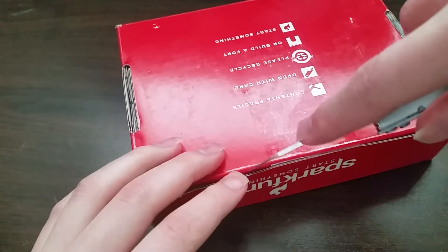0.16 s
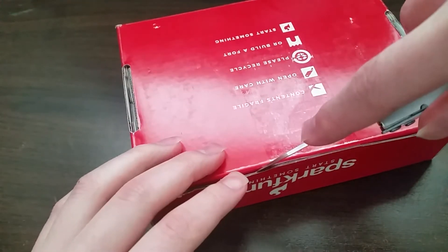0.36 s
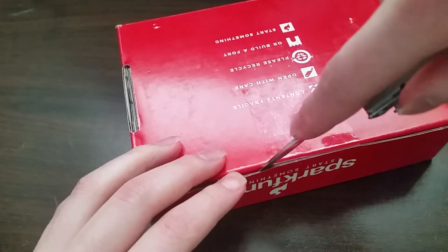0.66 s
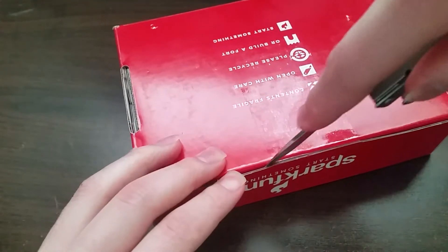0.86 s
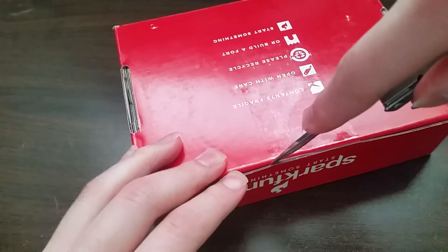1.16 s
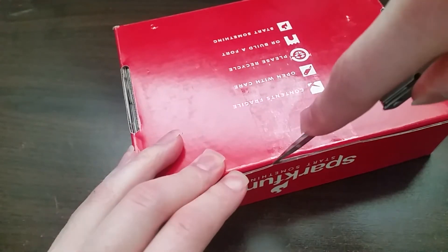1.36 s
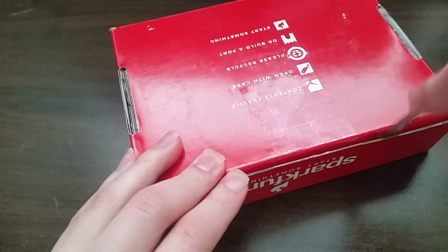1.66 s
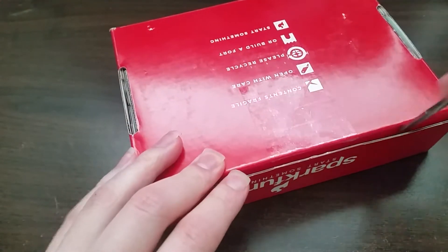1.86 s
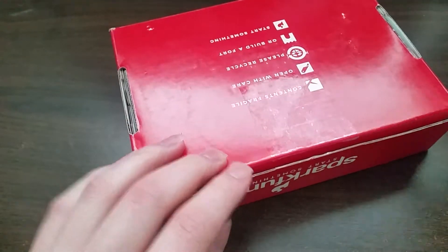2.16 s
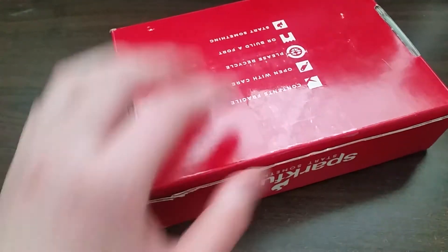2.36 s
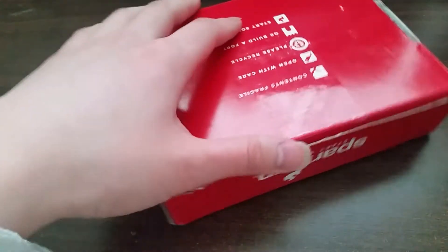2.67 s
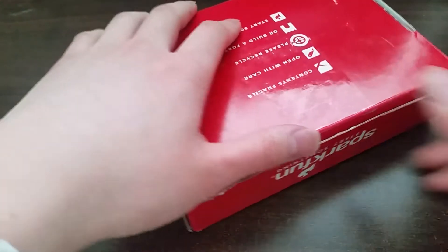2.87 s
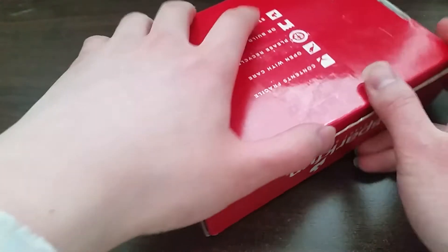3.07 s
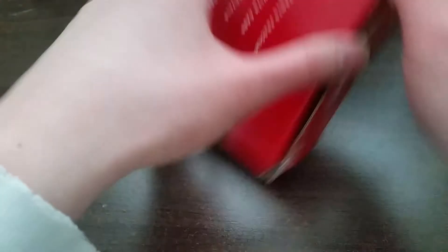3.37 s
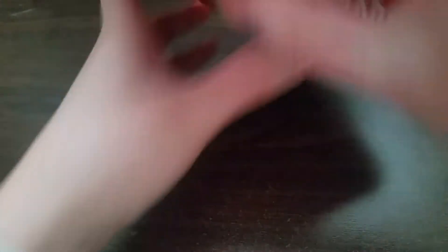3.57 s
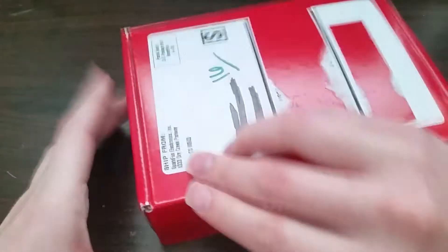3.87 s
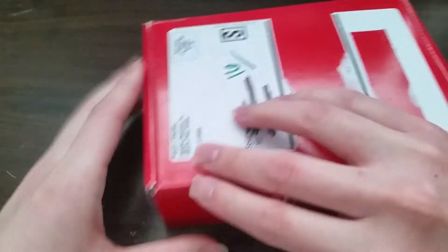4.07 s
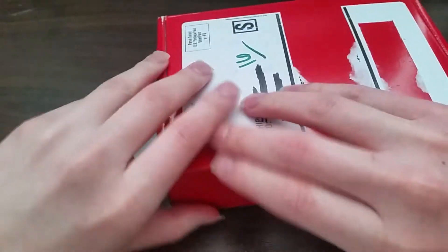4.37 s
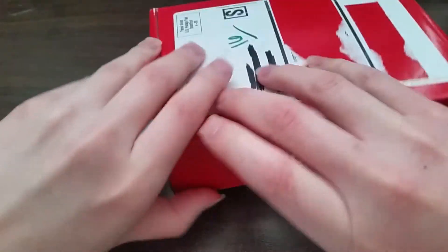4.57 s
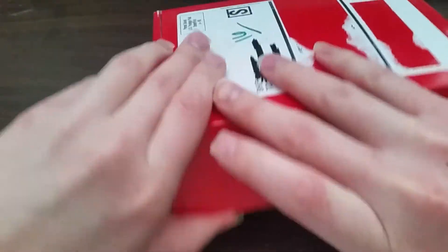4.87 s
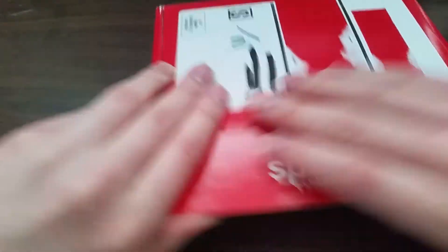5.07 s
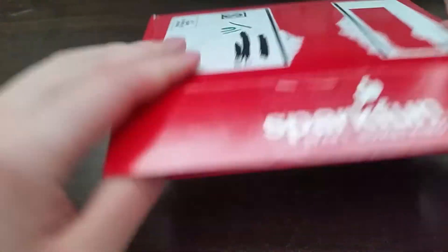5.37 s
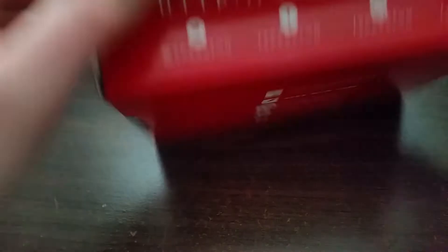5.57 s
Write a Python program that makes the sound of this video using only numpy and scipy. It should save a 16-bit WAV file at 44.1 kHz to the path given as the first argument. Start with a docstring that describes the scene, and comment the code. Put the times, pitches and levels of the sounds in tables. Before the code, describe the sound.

A small card box on a desk, heard very close. Faint dull taps come first, then a knife drops with a short double clatter, slightly to the right. A quiet gap leads to clustered hollow knocks, rustling handling and a heavy thud as the box is set down. Small finger taps follow, then scratchy cardboard scraping, a strong pop and a last thump, over unsteady low hum.

```python
"""A desk in a quiet room: close by, a blade and then fingers work at the taped flap of a small card box.
The knife drops on the desk; the box is turned, knocked down and slid, and the flap is pulled open.
Blows ring modes of card, steel and desk; strokes are random slips that drone, crackle, rasp, hiss and sing.
Far below lie a mains hum and a broad hiss; both swell and sink in level over time."""
import sys
import numpy as np
from scipy import signal
from scipy.fft import rfft, irfft
from scipy.io import wavfile

SR = 44100
rng = np.random.default_rng(int(sys.argv[2]) if len(sys.argv) > 2 else 0)


def master(y):
    """Save y as 16-bit WAV."""
    cut = np.clip(np.atleast_2d(y).T, -1, 1)
    pcm = np.round(cut * 32767)  # scale
    wavfile.write(sys.argv[1], SR, pcm.astype(np.int16))


N = 252712    # samples


# Blows on the box: (time [s], knock level [dB], thud level [dB], click level [dB])
BOX_BLOWS = [(0.095, -31.5, -24, -43.5), (0.238, -43.5, -34, -69), (0.264, -26, -32.5, -48),
             (0.342, -33.5, -45, -57), (0.555, -34.5, -29, -40.5), (0.705, -46, -40.5, -65),
             (0.949, -34.5, -38.5, -50), (1.116, -42, -35.5, -74), (1.283, -40.5, -35.5, -59.5),
             (1.76, -43, -43, -46.5), (1.92, -40.5, -53, -60), (1.933, -49, -50.5, -55),
             (2.178, -70, -77, -73), (2.255, -85, -85, -74), (2.508, -70, -54, -69),
             (2.538, -33, -25, -47.5), (2.648, -30.5, -31, -65), (2.7, -69, -26, -40),
             (2.732, -10.5, -17.5, -28), (2.753, -19, -10, -23), (2.841, -27.5, -17.5, -35),
             (2.877, -11.5, -17.5, -24), (2.882, -14, -18, -26), (3.035, -57, -66, -43),
             (3.279, -49, -62, -50), (3.323, -37, -39, -49), (3.415, -30.5, -41, -53),
             (3.479, -33, -34, -52), (3.49, -28, -31, -42), (3.528, -23, -26.5, -43),
             (3.545, -43, -26, -39), (3.561, -29.5, -21.5, -42), (3.579, -45, -30, -55),
             (3.712, -33.5, -32, -40.5), (3.837, -27, -38, -34.5), (3.855, -5, -6.5, -22),
             (3.876, -21, -15, -40), (3.896, -13.5, -19, -30), (3.932, -5, -5, -21.5), (3.95, -25, -6, -29),
             (3.985, -18.5, -49, -28.5), (4.142, -24.5, -41, -26.5), (4.403, -38, -49, -77),
             (4.437, -50, -37.5, -66), (4.499, -54, -39.5, -58), (4.651, -21.5, -26.5, -49.5),
             (4.764, -37.5, -32.5, -70), (5.103, -29, -23, -56), (5.226, -31, -28, -19.5),
             (5.342, -6.5, -7, -30), (5.365, -51, -47, -29.5), (5.46, -51, -33, -34),
             (5.673, -12.5, -10, -26)]
# Low and high modes of the box walls: (frequency [Hz], relative level [dB], free ring t60 [s])
WALL_MODES = [(135.4, -6, 0.3), (202.6, 1.5, 0.22), (237, -10, 0.53), (316, 3.5, 0.053), (352.2, 3.5, 0.11),
              (399.6, 4, 0.073), (497, -1.5, 0.09), (558.4, -7, 0.11)]
# Modes of the creased card: (frequency [Hz], relative level [dB], free ring t60 [s])
CREASE_MODES = [(700, 7.5, 0.011), (878, -4.5, 0.039), (1033, 5, 0.022), (1173, 0.5, 0.021),
                (1318, -2, 0.015), (1476, -3, 0.01), (1890, -5.5, 0.022), (2006, -15, 0.032),
                (2750, -13, 0.014)]
KNOCK_RING, THUD_RING = 1, 0.38    # share of the free ring time that the holding hands leave


def box_knocks():
    """Knocks ring the creases and thuds ring the walls, with a click at each contact."""
    return blows(BOX_BLOWS, CREASE_MODES, click_t60=0.022, ring_share=KNOCK_RING,
                 thud_share=THUD_RING, thud_modes=WALL_MODES, top_db=18.5)


def blows(table, modes, click_t60, ring_share, thud_share, thud_modes, top_db):
    """Mid knock and low thud ring in modes; the click is a burst of bright noise."""
    body, burst = np.zeros((2, N)), np.zeros(N)
    for s, knock_db, thud_db, click_db in table:
        add_blow(body, s, knock_db, ring_share, modes, wide_db=-4.0)
        add_blow(body, s, thud_db, thud_share, thud_modes, wide_db=-14.5)
        burst[round(s * SR)] = from_db(click_db)
    burst = decaying(burst, click_t60)
    burst = signal.lfilter([.04], [1, -.96], burst)    # the contact spreads in half a millisecond
    noise = coloured(rng.standard_normal((2, N)), SCRATCH_COLOUR)
    # squaring the burst leaves the top octave to hard contacts
    top = from_db(top_db) * burst ** 2 * band(noise, 12000, 22000)
    return body + top + burst * band(noise, 2500, 9000)


def add_blow(out, s, db, share, modes, wide_db):
    """Every mode gets its own strength and sign; damping hands scale all ring times by the share."""
    hz, mode_db, t60 = np.transpose(modes)[:, :, None]
    t = np.arange(round(.25 * SR)) / SR
    strength = from_db(mode_db + rng.normal(0, 3.0, hz.shape)) * rng.choice([-1, 1], hz.shape)
    detune = 1 + 0.021 * rng.standard_normal(hz.shape)    # the grip changes the walls a little
    rings = strength * np.sin(2 * np.pi * hz * detune * t)
    rings = rings * from_db(-60 * t / (t60 * max(share, .05)))
    rings = rings * (1 - np.exp(-t * hz / 0.14))    # soft card: each mode takes part of a cycle to build
    mid = rings.sum(axis=0)
    uneven = rng.choice([-1, 1], hz.shape) * np.sqrt(hz / hz.max())    # high modes radiate unevenly
    side = from_db(wide_db) * (rings * uneven).sum(axis=0)
    pair = from_db(db) * np.array([mid + side, mid - side]) / np.max(np.abs(mid))
    place = out[:, round(s * SR):][:, :len(t)]
    place += pair[:, :place.shape[1]]


def rubbing():
    """Slips shake the walls and creases in crumbly clumps, and scratch in the treble."""
    gains = strokes() + shudder(BOX_BLOWS, BOX_SHUDDER_DB) + shudder(KNIFE_BLOWS, KNIFE_SHUDDER_DB)
    drone, crackle, rasp, hiss = gains
    wall_slips = grit(1200, spread_db=3.0) * from_db(1.5 * drift(48))
    walls = shaken(WALL_MODES[1:], wall_slips, wide_db=-14, wander_db=3.5, ring_share=0.62)
    crease_slips = grit(2000, spread_db=2.5) * from_db(4.4 * drift(60))
    crease_modes = WALL_MODES[6:] + CREASE_MODES[:6]
    creases = shaken(crease_modes, crease_slips, wide_db=-10.0, wander_db=8.5, ring_share=0.99)
    scratch = friction(rasp, hiss, 15000, flicker_db=2.0, patchy_db=1.0)
    return drone * walls + crackle * creases + singing() + scratch


# Strokes of blade, skin and flap over the card: (time of the top [s], swell [s], fade [s],
# box drone level [dB], crackle level [dB], rasp level [dB], hiss level [dB], singing level [dB],
# singing frequency [Hz])
STROKES = [(0.59, 0.083, 0.24, -73, -77, -70.5, -83, -64.5, 1670),
           (0.878, 0.43, 0.22, -59.5, -55, -64, -65, -68.5, 1750),
           (3.0, 0.36, 0.16, -64, -54.5, -62, -57, -63, 1750),
           (3.201, 0.084, 0.11, -56, -46, -55, -58.5, -63, 1750),
           (3.359, 0.059, 0.14, -43, -55, -54.5, -55, -46, 794),
           (3.435, 0.12, 0.082, -41, -37.5, -51, -43, -45, 927),
           (3.588, 0.049, 0.41, -53.5, -53, -60.5, -48, -55.5, 700),
           (3.8, 0.094, 1, -51.5, -55.5, -60.5, -57, -67, 860),
           (4.225, 0.019, 0.081, -54, -52, -60, -71, -57, 960),
           (4.949, 0.12, 0.14, -65, -42, -48, -54.5, -50.5, 490),
           (5.025, 0.1, 0.098, -34.5, -46, -42, -45, -42, 880),
           (5.21, 0.14, 0.21, -41, -40.5, -37, -32.5, -36.5, 927),
           (5.42, 0.038, 0.5, -51.5, -71, -76, -77, -50.5, 850),
           (5.535, 0.12, 0.14, -42.5, -46.5, -47, -38.5, -42.5, 2880),
           (5.623, 0.061, 0.048, -33.5, -36.5, -45, -39, -40, 796)]
STROKE_DROP_DB = 20    # fall from the top over one swell or fade time


def strokes():
    """Gains of drone, crackle, rasp and hiss under all strokes."""
    return from_db(np.array(STROKES)[:, 3:7]).T @ np.array(swells())


def swells():
    """Each stroke swells to its top and fades, evenly in dB."""
    t = np.arange(N) / SR
    return [from_db(-STROKE_DROP_DB * np.maximum((s - t) / swell, (t - s) / fade))
            for s, swell, fade, *_ in STROKES]


OVERTONE, OVERTONE_DB = 2.24, -4    # upper singing band: frequency ratio and level against the lower
SING_CYCLES = 30    # cycles of the lower band in which both bands fall 60 dB


def singing():
    """Each stroke excites one patch of card, whose two lowest modes colour its rasp."""
    slips = grit(3000, spread_db=2.5) * from_db(2.3 * drift(30))
    near = slips[0] + from_db(-9) * slips[1] * [[1], [-1]]
    out = np.zeros((2, N))
    for shape, (s, swell, fade, *_, db, hz) in zip(swells(), STROKES):
        span = slice(max(round((s - 3 * swell) * SR), 0), round((s + 3 * fade) * SR))
        t60 = SING_CYCLES / hz
        low = rms_one(ring(near[:, span], hz, t60))
        high = rms_one(ring(near[:, span], hz * OVERTONE, t60))
        out[:, span] += from_db(db) * shape[span] * (low + from_db(OVERTONE_DB) * high)
    return out


# dB of drone under the thud, crackle and rasp under the knock, hiss under the click
BOX_SHUDDER_DB, KNIFE_SHUDDER_DB = (-22, -19, -35.5, -27), (-17.5, -30.5, -33.5, -36.5)
SHUDDER_T60_S = (0.3, 0.15, 0.46, 0.15)    # drone, crackle, rasp, hiss


def shudder(table, under_db):
    """After a blow the loose card shudders: dying gains of drone, crackle, rasp and hiss."""
    s, knock_db, thud_db, click_db = np.transpose(table)
    out = np.zeros((4, N))
    for k, db in enumerate([thud_db, knock_db, knock_db, click_db]):
        out[k, np.round(s * SR).astype(int)] = from_db(db + under_db[k])
        out[k] = decaying(out[k], SHUDDER_T60_S[k])
    return out


def shaken(modes, slips, wide_db, wander_db, ring_share):
    """Slips ring the modes, each mode coming and going as the grip changes; rms 1."""
    rings = []
    for k, (hz, db, t60) in enumerate(modes):
        level = from_db(db + wander_db * drift(9.2))
        rings.append(level * ring(slips[k % 2], hz, t60 * ring_share))
    mid = sum(rings)
    side = from_db(wide_db) * (sum(rings[::2]) - sum(rings[1::2]))
    return band(np.array([mid + side, mid - side]), 150, 6000)


# Colour of scratching and clicking contact: (frequency [Hz], spectrum level [dB per Hz])
SCRATCH_COLOUR = [(400, -33.5), (850, -6.5), (1600, -3), (2050, -2.5), (3000, -9.5), (4900, -9), (6400, -3),
                  (7300, -10.5), (8300, -28.5), (11000, -28), (16500, -26)]
# Edges of the scrape bands, each of which wanders alone: (frequency [Hz])
SCRAPE_EDGES = [500, 900, 1500, 2400, 3500, 5200, 8000, 17000]
TOP_DB, TOP_GROWTH = 5.5, 0.37    # highest band: lift where the hiss is at -35 dB, extra dB per dB of hiss


def friction(rasp, hiss, per_s, flicker_db, patchy_db):
    """Coarse slips rasp and the finest hiss, flickering; the colour shifts as the contact moves."""
    noise = rfft(coloured(grit(per_s, spread_db=0.5), SCRATCH_COLOUR))
    which = np.searchsorted(SCRAPE_EDGES, np.arange(N // 2 + 1) * SR / N).clip(1, 7)
    parts = [irfft(noise * (which == k), N) * from_db(patchy_db * drift(8.6)) for k in range(1, 8)]
    low = rms_one(sum(parts[:4]) + from_db(-7.5) * parts[4])
    high = parts[4] + parts[5]
    top = from_db(TOP_DB) * (hiss / from_db(-35)) ** TOP_GROWTH * parts[6]    # firm pressure brightens
    high = (high + top) / np.std(high)
    rasping = rasp * from_db(flicker_db * drift(33)) * low
    return rasping + hiss * from_db(.5 * flicker_db * drift(40)) * high


# Short harsh skids and rattles of the box: (time [s], length [s], rasp level [dB], hiss level [dB])
BOX_SKIDS = [(0.324, 0.042, -51, -59), (3.896, 0.035, -21.5, -33.5), (3.929, 0.064, -23, -63),
             (4.211, 0.03, -49.5, -53), (5.212, 0.038, -31, -34), (5.665, 0.026, -28.5, -37.5)]


def box_skids():
    """The box skids and rattles in short harsh bursts of friction."""
    return skids(BOX_SKIDS)


def skids(table):
    """Friction with a sudden start, a short hold and a quick end."""
    t = np.arange(N) / SR
    shapes = [np.clip(np.minimum((t - s) / 0.0079, (s + length - t) / 0.024), 0, 1)
              for s, length, *_ in table]
    rasp, hiss = from_db(np.array(table)[:, 2:]).T @ np.array(shapes)
    return friction(rasp, hiss, 4000, flicker_db=3.5, patchy_db=2.0)


# The knife lands on the desk: (time [s], knock level [dB], thud level [dB], click level [dB])
KNIFE_BLOWS = [(1.506, -15.5, -17.5, -17), (1.52, -26.5, -37.5, -23), (1.533, -33.5, -36.5, -19.5),
               (1.551, -4, -8.5, -3.5)]
# Modes of the knife: (frequency [Hz], relative level [dB], free ring t60 [s])
STEEL_MODES = [(1110, 5.5, 0.046), (1400, 0, 0.055), (1750, 6.5, 0.022), (1870, 3.5, 0.031),
               (2650, -7.5, 0.033)]
# The knife rattles to rest: (time [s], length [s], rasp level [dB], hiss level [dB])
KNIFE_RATTLE = [(1.562, 0.022, -19.5, -21)]
# narrow bright resonance that colours the treble
BRIGHT_HZ, BRIGHT_T60_S, BRIGHT_DB = 6350, 0.0093, -19
KNIFE_RIGHT_DB = 7.5    # its treble leans right: right over left


def knife():
    """The knife lands, bounces and rattles; the treble rings near 6.3 kHz."""
    steel = blows(KNIFE_BLOWS, STEEL_MODES, click_t60=0.0069, ring_share=0.55,
                  thud_share=0.6, thud_modes=WALL_MODES[4:], top_db=-10)
    steel = steel + skids(KNIFE_RATTLE)
    treble = signal.sosfilt(signal.butter(1, [3600, 7500], "band", fs=SR, output="sos"), steel)
    bright = treble + from_db(BRIGHT_DB) * ring(treble, BRIGHT_HZ, BRIGHT_T60_S)
    return steel - treble + bright * leaning_right(KNIFE_RIGHT_DB)


# Booms under the weight of the box: (time [s], level [dB])
DESK_BUMPS = [(1.593, -36), (2.691, -24.5), (2.751, -22), (3.562, -31.5), (3.934, -23), (5.668, -23)]
# Modes of the desk top: (frequency [Hz], relative level [dB], ring t60 [s])
DESK_MODES = [(61, -19.5, 0.043), (76.5, -8, 0.31), (121.7, -13.5, 0.23), (132, -5, 0.092)]


def desk():
    """The desk top booms dully in its low modes under the weight of the box."""
    out = np.zeros((2, N))
    for s, db in DESK_BUMPS:
        add_blow(out, s, db, 1, DESK_MODES, wide_db=-19)
    return out


ROOM_T60_S, ROOM_DB = 0.28, -11    # decay, and level of the tail


def room(x):
    """A dying noise tail starting with the first echoes; only its treble differs between the sides."""
    t = np.arange(round(.6 * SR)) / SR
    late = t > .006    # first echoes after 6 ms
    mid, side = rng.standard_normal((2, len(t))) * from_db(-60 * t / ROOM_T60_S) * late
    side = signal.lfilter(*signal.butter(1, 900, "high", fs=SR), side)
    tail = rms_one(np.array([mid + side, mid - side])) / np.sqrt(len(t))
    return signal.fftconvolve(x, tail, axes=1)[:, :N]


# Mains lines: (frequency [Hz], relative level [dB])
HUM_LINES = [(120, 1.5), (240, -16.5)]
# Course of the hum: (time [s], level [dB])
HUM_COURSE = [(0, -43.5), (1.5, -43.5), (1.7, -59), (2.0, -61.5), (2.53, -62), (2.56, -47), (3.0, -47),
              (3.5, -47.5), (4.1, -47), (4.3, -54.5), (4.75, -51.5), (5.05, -46.5), (5.73, -43)]
# Colour of the hiss: (frequency [Hz], spectrum level [dB per Hz])
HISS_COLOUR = [(25, -4), (87, -16), (182, -7.5), (378, -11.5), (617, -21), (1100, -26), (1800, -35),
               (3060, -44), (6730, -29), (8200, -63), (10500, -74.5), (12500, -46), (16000, -47)]
# Likeness of the hiss at left and right: (frequency [Hz], likeness [0 to 1])
HISS_WIDTH = [(60, 0.9), (290, 0.75), (640, 0.3), (3100, 0)]
HISS_DB = -50    # where the hum is as loud as at the start
HISS_FOLLOWS = (1, 1.3, 1.9)    # dB per dB of hum for rumble, middle and top


def background():
    """Mains lines waver slightly over a broad hiss that swells and sinks with them, most at the top."""
    t = np.arange(N) / SR
    hum_db = np.interp(t, *np.transpose(HUM_COURSE))
    hum = sum(from_db(db + 1.7 * drift(9.2)) * np.sin(2 * np.pi * (hz * t + rng.random()))
              for hz, db in HUM_LINES)
    hiss = coloured(rng.standard_normal((2, N)), HISS_COLOUR, HISS_WIDTH)
    rumble = signal.sosfiltfilt(signal.butter(2, 90, fs=SR, output="sos"), hiss)
    top = signal.sosfiltfilt(signal.butter(4, 9000, "high", fs=SR, output="sos"), hiss)
    parts = zip(HISS_FOLLOWS, [rumble, hiss - rumble - top, top])
    hiss = sum(from_db(follows * (hum_db - hum_db[0])) * part for follows, part in parts)
    return from_db(hum_db) * np.sqrt(2) * hum + from_db(HISS_DB + 0.27 * drift(6.1)) * hiss


def from_db(db):
    """Decibels to gain."""
    return 10 ** (np.asarray(db) / 20)


def rms_one(x):
    """Scaled to rms 1."""
    return x / np.sqrt(np.mean(x ** 2) + 1e-20)


def leaning_right(db):
    """Gains of left and right that differ by so many dB."""
    return from_db([[-db / 2], [db / 2]])


def at_hz(points, hz):
    """A spectrum read on a log axis."""
    return np.interp(np.log(hz), np.log(np.array(points)[:, 0]), np.array(points)[:, 1])


def band(x, low_hz, high_hz):
    """A band of rms 1."""
    return rms_one(signal.sosfilt(signal.butter(2, [low_hz, high_hz], "band", fs=SR, output="sos"), x))


def drift(rate):
    """Slow chance of spread 1: smoothed noise made at every 40th sample; rate in Hz."""
    r = np.exp(-80 * np.pi * rate / SR)
    slow = signal.lfilter([1], [1, -2 * r, r * r], rng.standard_normal(N // 40 + 2002))[2000:]
    return np.interp(np.arange(N) / 40, np.arange(len(slow)), rms_one(slow))


def decaying(clicks, t60):
    """Each click starts a level that dies away exponentially."""
    return signal.lfilter([1], [1, -from_db(-60 / (t60 * SR))], clicks + 1e-18)


def ring(clicks, hz, t60):
    """A unit click sets a dying sine of starting height 1 ringing."""
    r, w = from_db(-60 / (t60 * SR)), 2 * np.pi * hz / SR
    return signal.lfilter([0, np.sin(w)], [1, -2 * r * np.cos(w), r * r], clicks + 1e-18)


def grit(per_s, spread_db):
    """Tiny random slips of uneven size in two unrelated rows."""
    sizes = from_db(spread_db * np.minimum(rng.exponential(1, (2, N)), 5)) * rng.standard_normal((2, N))
    return sizes * (rng.random((2, N)) < per_s / SR)


# Likeness of box and knife at left and right: (frequency [Hz], likeness [0 to 1])
NEAR_WIDTH = [(60, 0.9), (600, 0.45), (1400, 0.067), (15000, 0.07)]


def coloured(pair, spectrum, likeness=NEAR_WIDTH):
    """Two unrelated rows become a left-right pair with the given colour; rms 1."""
    hz = np.maximum(np.arange(N // 2 + 1) * SR / N, 1)
    alike = np.clip(at_hz(likeness, hz), -1, 1)
    mid, side = rfft(pair) * from_db(at_hz(spectrum, hz))
    return rms_one(irfft(np.sqrt(1 + alike) * mid + np.sqrt(1 - alike) * side * [[1], [-1]], N))


def scene():
    """Box and knife close by with their room, over the background; the right side is a little louder."""
    hits = box_knocks() + knife() + box_skids()
    near = hits + desk() + rubbing()
    return (near + from_db(ROOM_DB) * room(hits) + background()) * leaning_right(3)


def record(dry):
    """The microphone loses the deepest bass, peaks are rounded, the top is cut."""
    dry = signal.sosfilt(signal.butter(4, 42, "high", fs=SR, output="sos"), dry)
    rounded = .82 * np.tanh(dry / .82)
    return signal.sosfilt(signal.cheby2(18, 100, 17000, fs=SR, output="sos"), rounded)


dry = scene()
out = record(dry)
master(out)
```